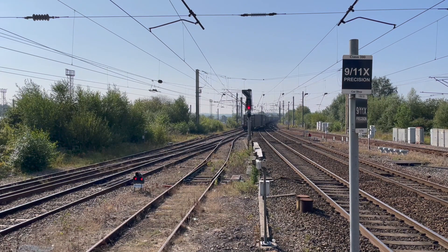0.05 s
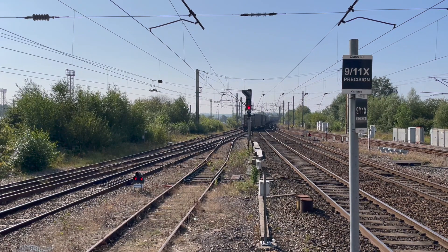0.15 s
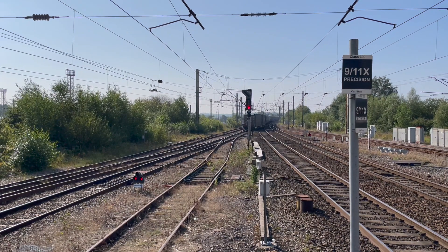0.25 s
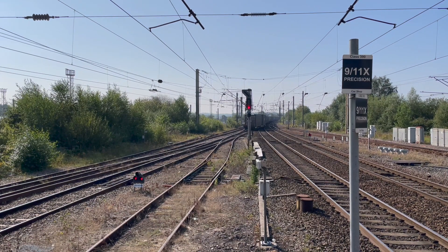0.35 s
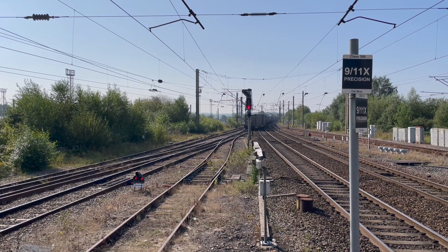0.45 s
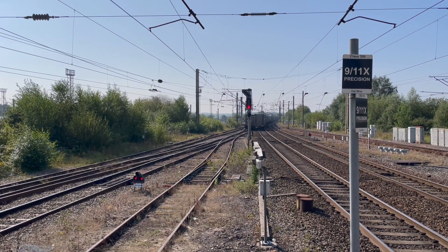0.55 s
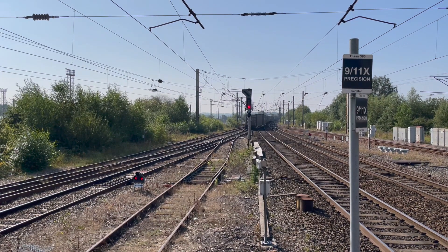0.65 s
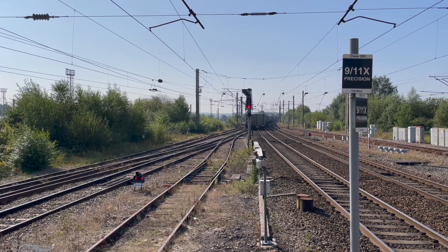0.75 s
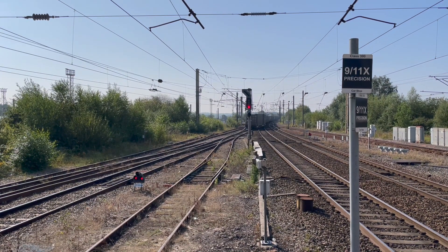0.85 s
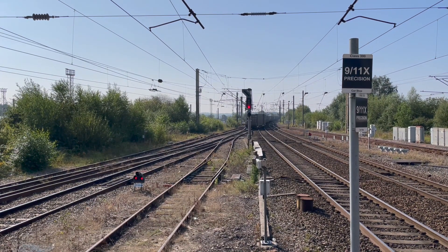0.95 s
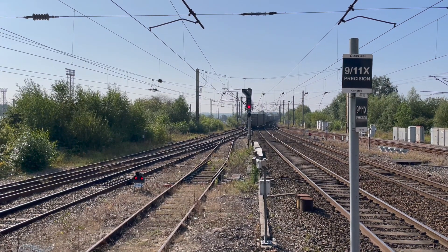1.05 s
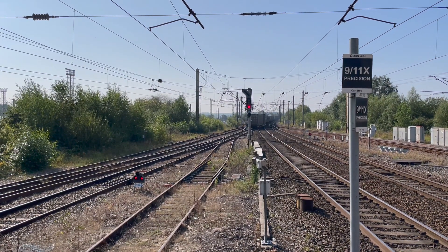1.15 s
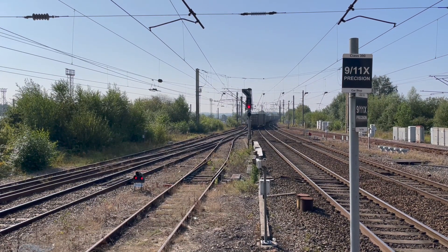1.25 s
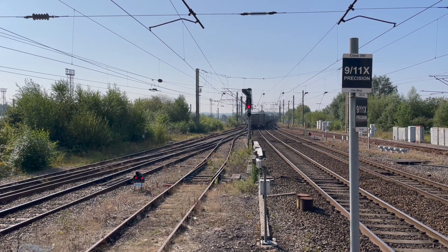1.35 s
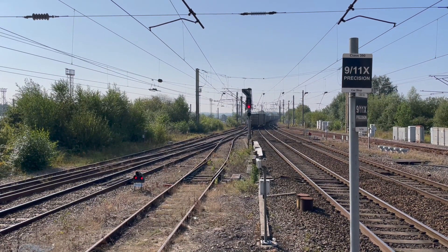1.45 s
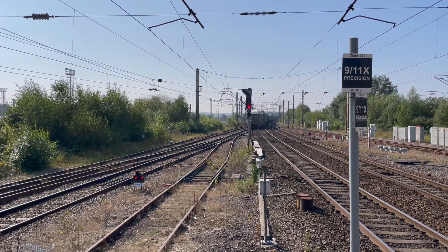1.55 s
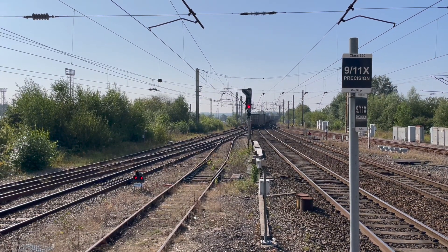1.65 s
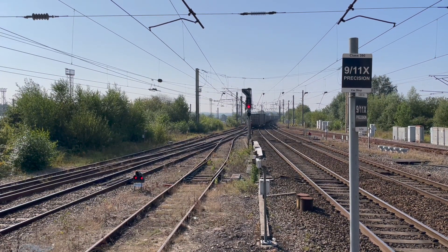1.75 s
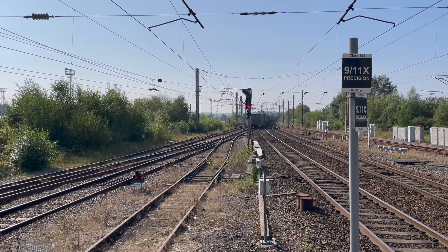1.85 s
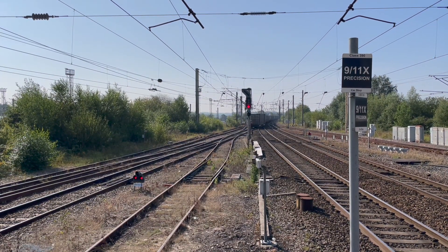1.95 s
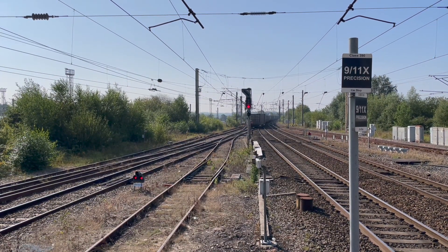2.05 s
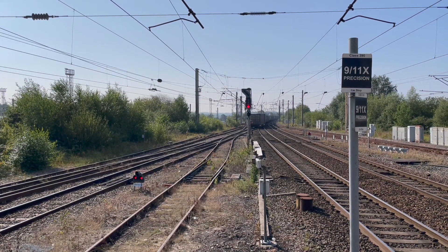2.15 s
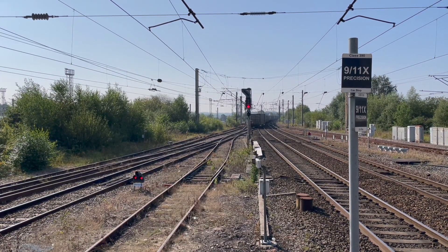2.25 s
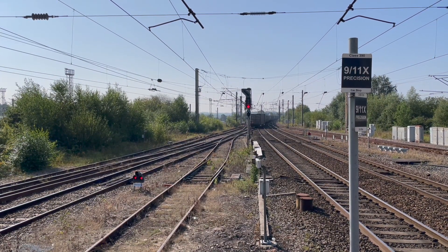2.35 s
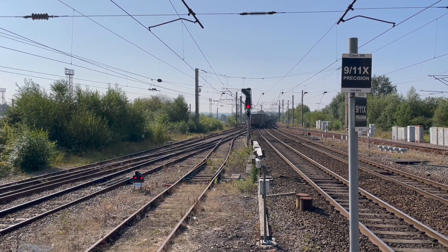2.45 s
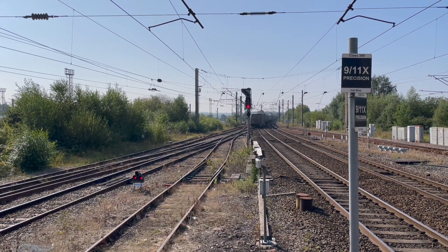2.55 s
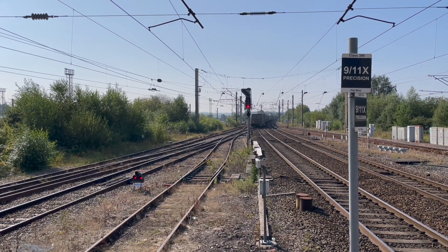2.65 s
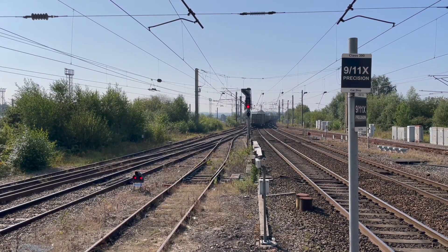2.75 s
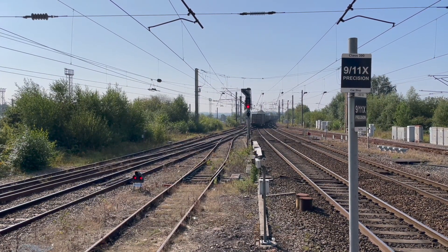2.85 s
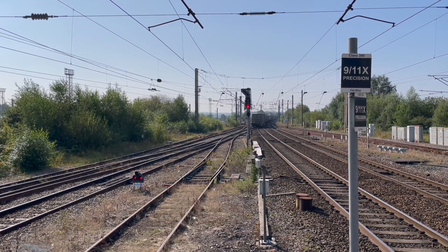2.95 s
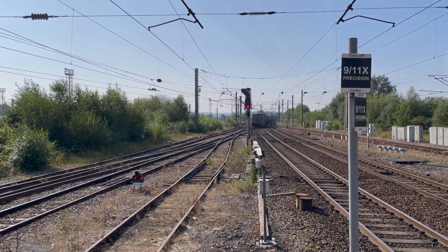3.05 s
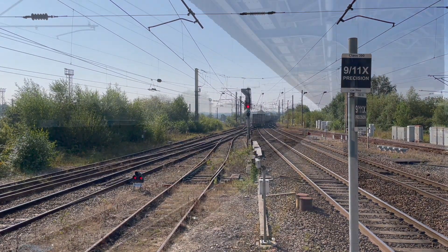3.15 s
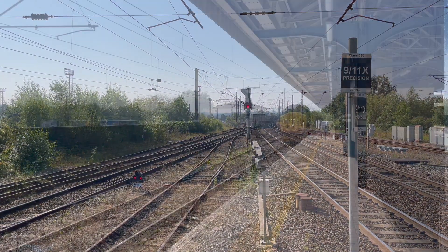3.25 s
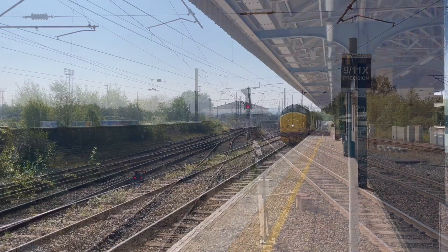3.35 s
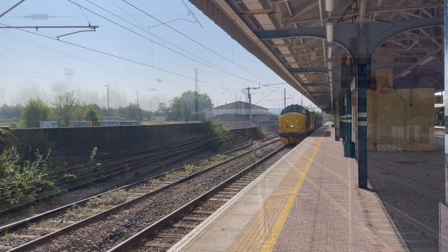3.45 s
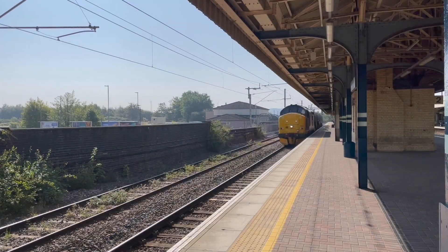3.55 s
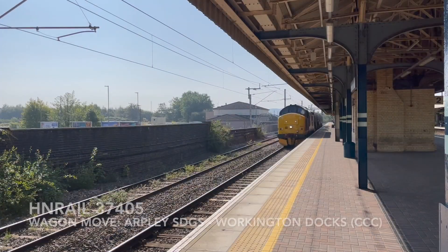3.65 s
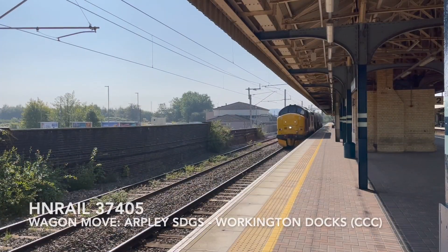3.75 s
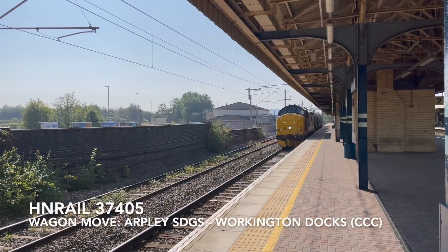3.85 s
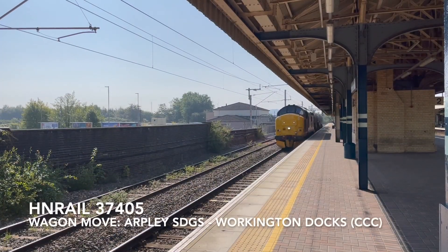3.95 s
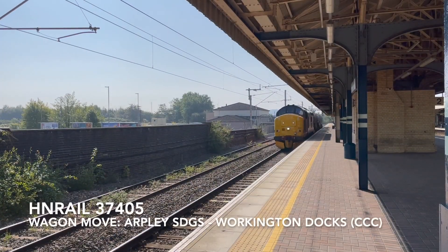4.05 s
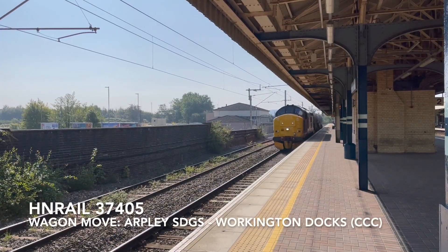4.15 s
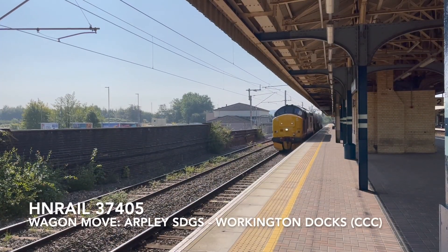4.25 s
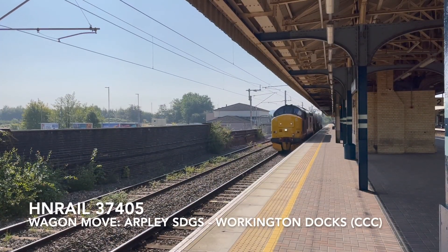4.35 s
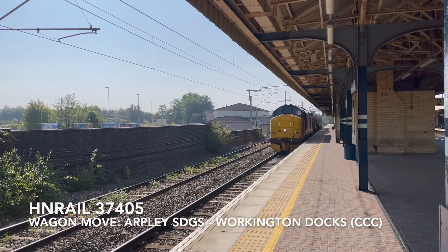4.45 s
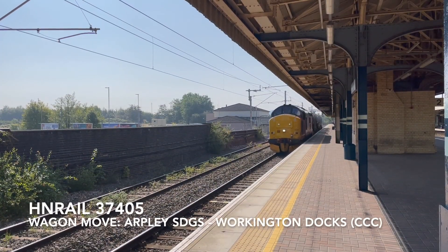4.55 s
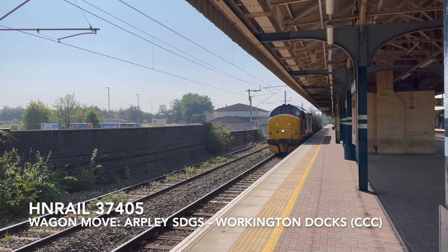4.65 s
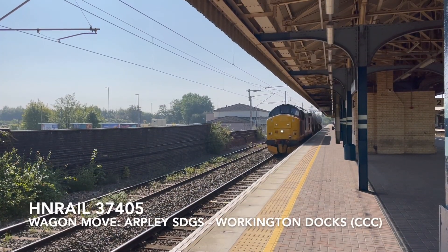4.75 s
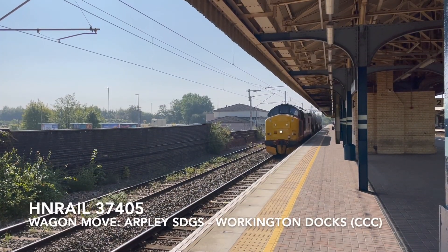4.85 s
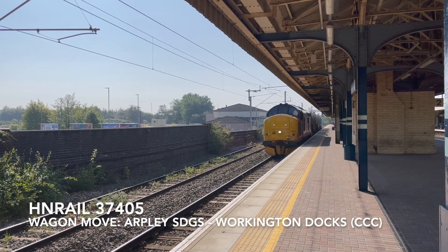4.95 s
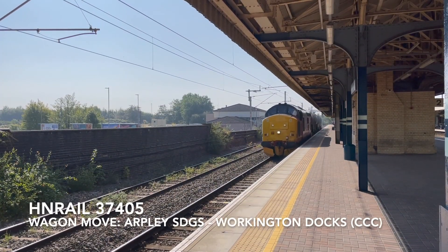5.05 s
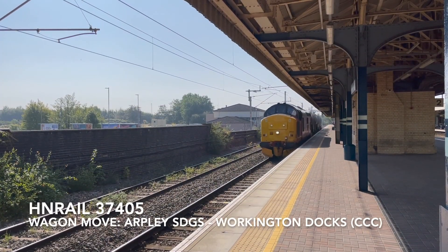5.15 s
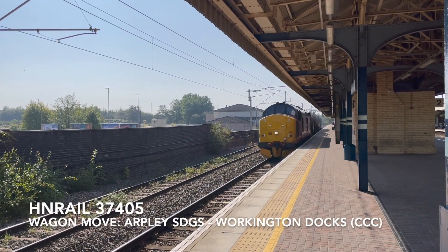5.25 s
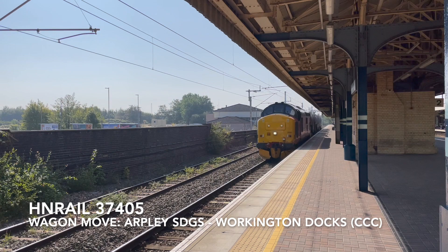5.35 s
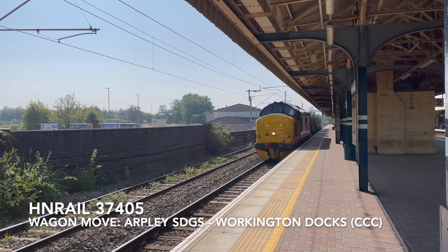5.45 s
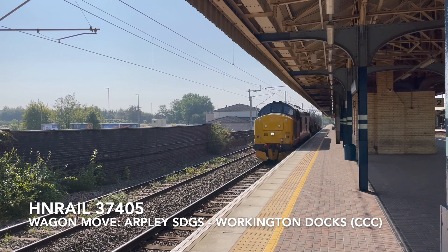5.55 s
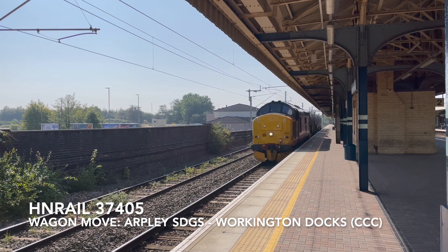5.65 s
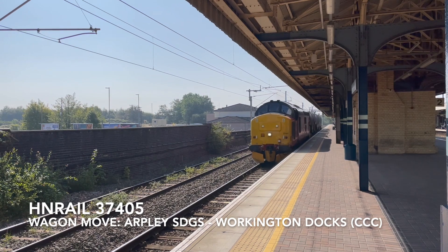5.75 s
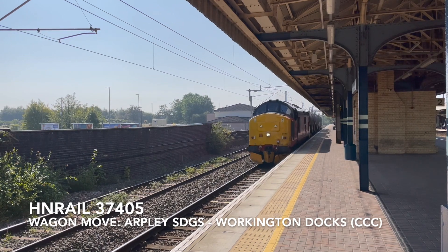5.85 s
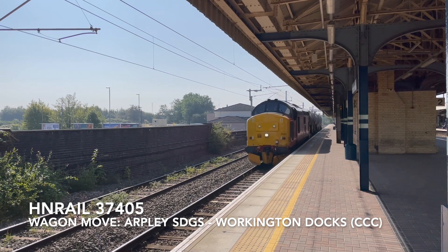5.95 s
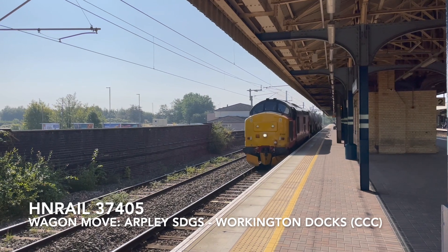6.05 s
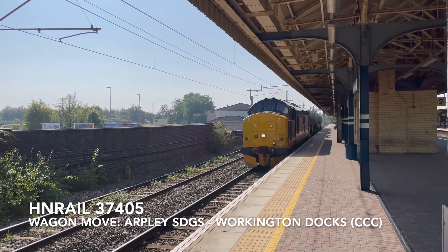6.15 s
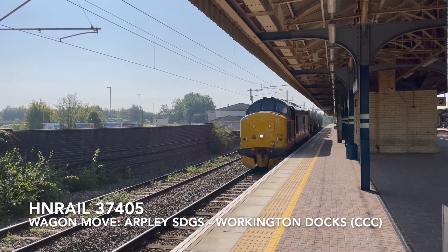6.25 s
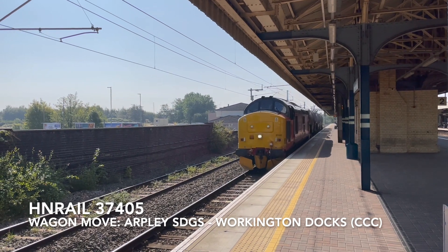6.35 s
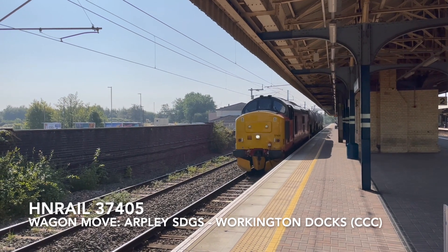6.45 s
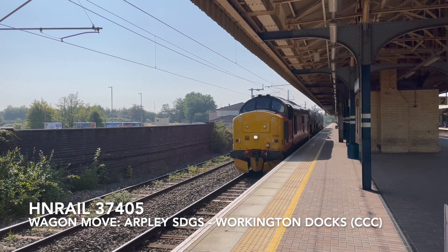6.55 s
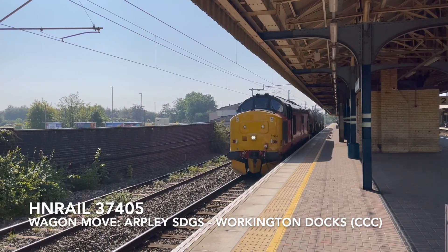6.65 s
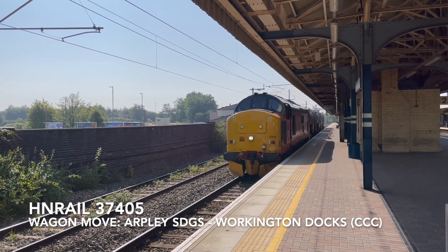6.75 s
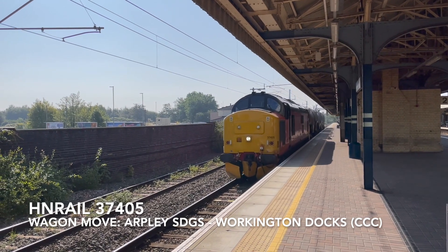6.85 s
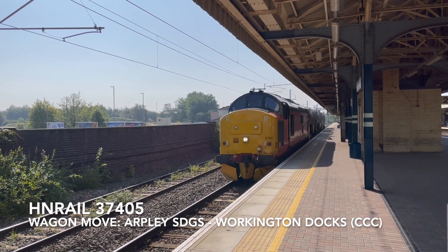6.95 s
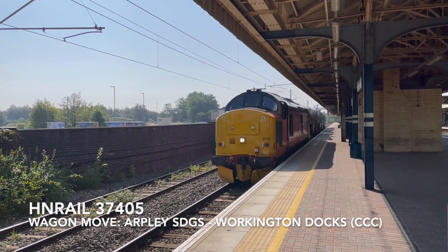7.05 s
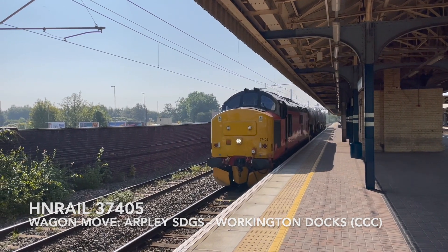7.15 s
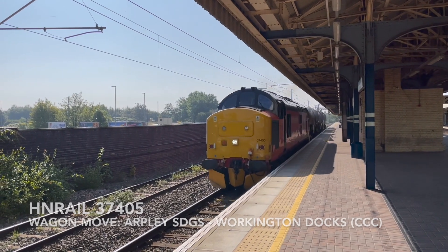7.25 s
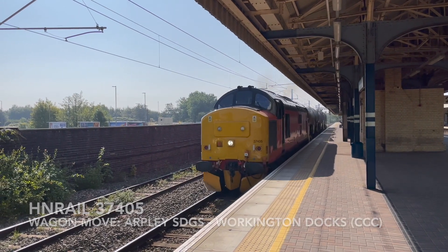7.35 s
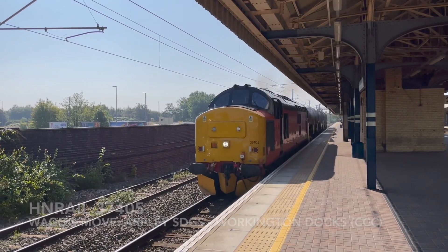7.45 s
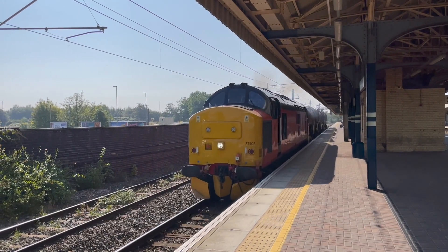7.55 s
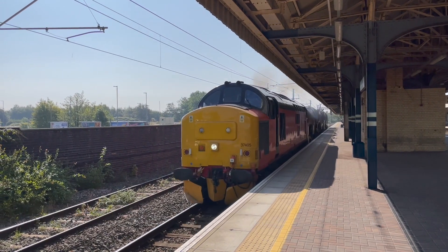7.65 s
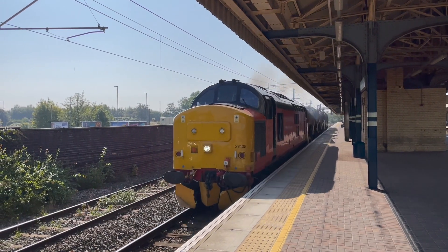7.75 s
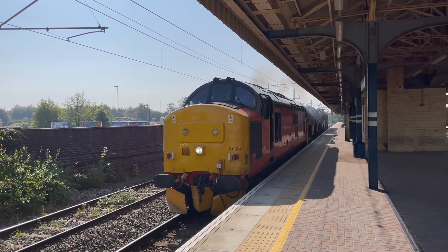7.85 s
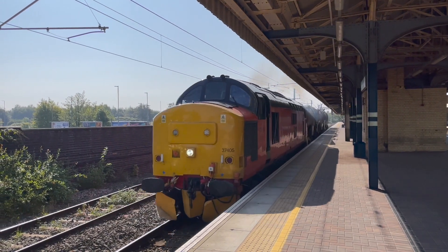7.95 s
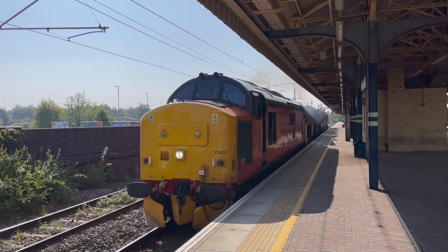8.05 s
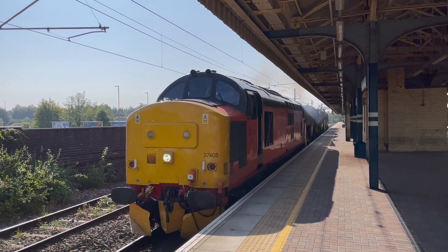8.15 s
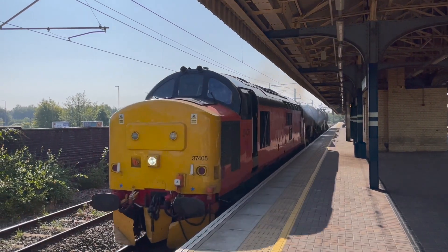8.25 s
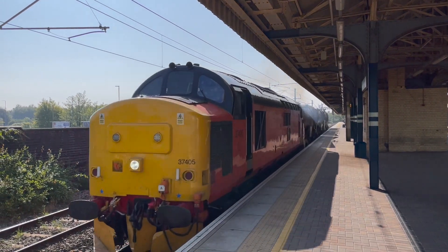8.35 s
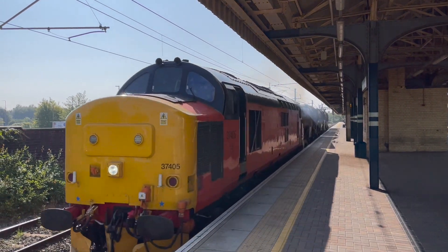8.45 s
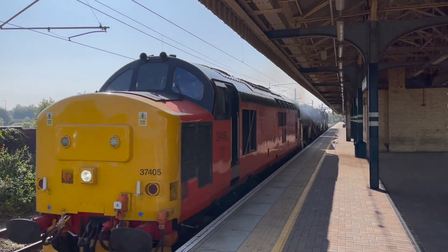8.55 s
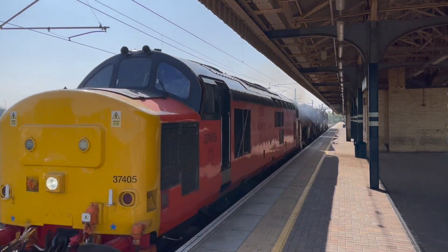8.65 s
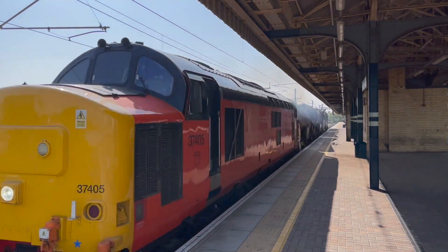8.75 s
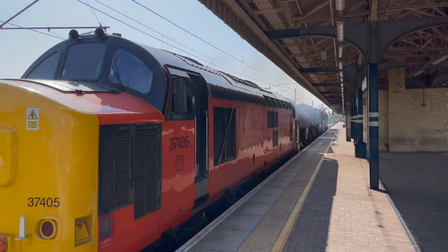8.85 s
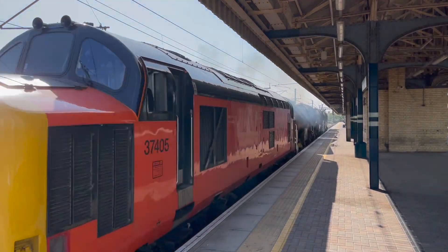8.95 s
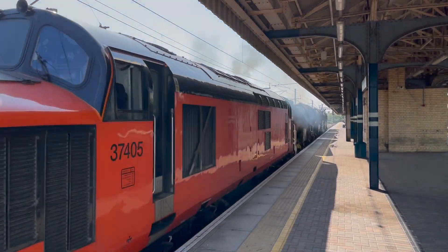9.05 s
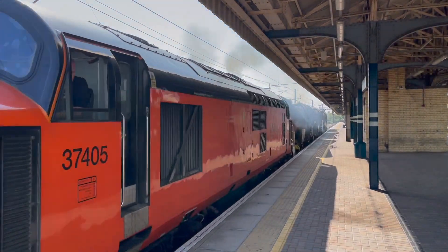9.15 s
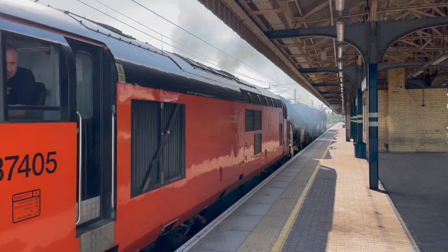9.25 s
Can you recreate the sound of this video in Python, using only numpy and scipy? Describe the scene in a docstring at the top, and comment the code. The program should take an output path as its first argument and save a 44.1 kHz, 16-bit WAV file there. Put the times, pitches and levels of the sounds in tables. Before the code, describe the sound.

A handheld stereo microphone catches soft wind thumps, chirps, a faint whine and washed-out metal clanks across quiet tracks. The scene dissolves to a covered platform where an approaching diesel idles low, then barks and throbs, eases with a brief hum, roars harder with crackling rasp, drops back again, and blasts a third time close by, over pulsing rolling noise, low boom and hiss.

```python
"""A twelve-cylinder diesel locomotive opens up in three surges under a platform roof: tones locked to
the firing rate throb, two stacks puff gated noise in turn, and ringing, knocks and crackles rasp on top.
Rolling noise, rumble and hiss lie under it, shaped by level curves, partly pulsing with the exhaust.
Before it, a quiet rail yard fades out: noise for far rumble and wind, thumps on the microphone,
gliding bird whistles, far clanks of filtered noise and a faint whine."""
import sys
import numpy as np
from scipy import signal
from scipy.fft import rfft, irfft, next_fast_len
from scipy.io import wavfile
from scipy.ndimage import uniform_filter1d

SR = 44100
rng = np.random.default_rng(int(sys.argv[2]) if len(sys.argv) > 2 else 0)


def output_pcm(signal):
    """Save a mono or channel-first signal as 16-bit PCM at the path in sys.argv[1].

    Samples are clipped to [-1, 1] before scaling.
    """
    pcm = np.clip(np.atleast_2d(signal).T, -1, 1) * 32767
    wavfile.write(sys.argv[1], SR, np.round(pcm).astype(np.int16))


N = 410571
SIZE = next_fast_len(N)
HZ = np.maximum(np.arange(SIZE // 2 + 1) * SR / SIZE, 1)
T = np.arange(N) / SR

# Every *_COLOUR is a relative noise spectrum: pitch_hz, level_db (per Hz); noise() evens its loudness.
# Engine speed: time_s, firings_per_s
ENGINE_SPEED = [(5, 45.45), (5.3, 51.16), (5.45, 54.69), (5.6, 55.48), (5.95, 62.32), (6.25, 65.38),
                (6.95, 63.48), (7.55, 71.0), (7.9, 76.0), (8.1, 74.63), (8.45, 70.24), (8.8, 69.17),
                (9.1, 73.77), (9.3, 76.16)]
# Engine load in three surges: time_s, bark_level_db, throb_level_db
ENGINE_LOAD = [(4.95, -43, -41), (5.1, -32, -36), (5.27, -28.5, -40), (5.45, -28, -28), (5.65, -22.5, -17),
               (5.9, -21.5, -17), (6.12, -25, -18.5), (6.27, -29, -20.5), (6.55, -33, -18),
               (6.8, -35.5, -19.5), (6.95, -26, -15), (7.15, -16, -17), (7.5, -14.5, -13.5),
               (7.75, -16, -14), (8.1, -25.5, -16), (8.37, -39.5, -17), (8.62, -26, -16.5),
               (8.7, -22.5, -13.5), (8.79, -17.5, -15), (8.96, -14, -19), (9.31, -18, -21)]
# Side lines of the exhaust: multiple_of_firing_rate, level_db
SIDE_LINES = [(1 / 2, -3), (3 / 4, -5), (5 / 4, -4), (3 / 2, -3), (7 / 4, 3.5), (9 / 4, -8), (5 / 2, -12.5),
              (11 / 4, -16)]
# What pipe and platform roof pass: pitch_hz, level_db
PIPE_RESPONSE = [(20, -23), (35, -14), (55, 2), (68, 10.5), (85, 1.5), (100, -4), (115, 1.5), (135, -1.5),
                 (200, -9)]
# Hum that swells as the engine eases: time_s, pitch_hz, level_db
EASING_HUM = [(6.12, 213, -63), (6.24, 215.3, -30), (6.38, 216.5, -23.5), (6.52, 221.6, -32),
              (6.68, 220, -51)]
# Relative strength of the three puffs a stack gives in an engine cycle: level_db
PUFF_STRENGTHS = [4.5, 4, 4.5]
# Start and end of the two bark crossfades, far to middle and middle to near: time_s
BARK_CROSSFADES = [6.1, 7.0, 8.1, 8.6]
# Bark as the locomotive nears: pitch_hz, level_db (per Hz)
BARK_FAR_COLOUR = [(120, -34), (200, -11.5), (367, 5.5), (420, -8.5), (643, -2.5), (726, -1.5), (911, 1),
                   (998, -7), (1110, 2), (1440, -7.5), (1700, -15.5), (2100, -9.5), (2550, -8.5),
                   (2850, -21.5), (3300, -14.5), (3750, -18), (4200, -13.5), (4700, -20.5), (7500, -25.5),
                   (9750, -73), (16500, -120)]
BARK_MID_COLOUR = [(120, -3.5), (200, 7), (251, -17), (396, 5), (482, -7.5), (596, -1.5), (858, -2.5),
                   (1220, -8.5), (1550, -3), (1800, -17), (2300, -13.5), (2900, -15.5), (3500, -14),
                   (3900, -20), (4830, -19.5), (5620, -25.5), (6440, -23), (7500, -21), (9750, -72),
                   (16500, -120)]
BARK_NEAR_COLOUR = [(120, -44), (200, -17), (306, -12), (440, 1.5), (569, -13), (771, -10), (968, -17),
                    (1460, -10), (1890, -20), (2560, -21.5), (2890, -24.5), (4210, -23.5), (5540, -27.5),
                    (6440, -25), (7500, -26.5), (9750, -58), (16500, -120)]
# How much louder the first stack is than the second, in each surge: pitch_hz, level_db
STACK_LEAN_FAR = [(500, -5.5), (750, 10), (900, -5), (1100, 22), (1400, -7), (2000, 0), (2400, 8),
                  (4000, 3)]
STACK_LEAN_MID = [(500, 4), (700, 0.5), (850, -7), (1100, 14), (1500, 8), (2200, -2), (3000, 7), (5000, 1)]
STACK_LEAN_NEAR = [(500, 5), (750, -3), (950, 10), (1200, 9), (1550, 4), (1850, 3), (3000, -2), (5000, 7.5)]
# Pipe and platform resonances in each surge, one list for each stack: pitch_hz, level_db
STACK_RINGS_FAR = [
    [(1093, -6), (1411, -5), (2250, -21)],
    [(914, -14), (371, -22), (2430, -17)],
]
STACK_RINGS_MID = [
    [(982, -11), (1604, -16), (809, -6.5), (515, -28)],
    [(688, -13), (1550, -9.5), (367.3, -4), (3060, -16.5), (2256, -21), (1055, -14)],
]
STACK_RINGS_NEAR = [
    [(1445, -12), (798, -6.5), (440, -5.5)],
    [(1543, -12), (1210, -10.5), (402, -15), (2610, -15.5)],
]
# Low exhaust boom, before and after the last crossfade: pitch_hz, level_db (per Hz)
BOOM_COLOUR = [(25, -50), (55, -14), (80, -1.5), (97, 2.5), (177, -9), (247, -16.5), (300, -35), (390, -28),
               (660, -120)]
BOOM_NEAR_COLOUR = [(25, -50), (60, -23), (83, -8), (97, -17), (118, 0), (157, 2), (205, -27), (300, -12.5),
                    (390, -46), (660, -120)]
# Hard exhaust knocks, each in one resonance of pipe or platform: start_s, level_db, pitch_hz
EXHAUST_KNOCKS = [(5.089, -18.5, 1053), (5.176, -15, 1050), (5.255, -14, 1030), (5.371, -23, 915),
                  (5.412, -14.5, 1050), (5.553, -12, 1053), (5.628, -10.5, 1115), (5.663, -14, 900),
                  (5.693, -12, 1130), (5.762, -16, 1125), (5.83, -14.5, 1050), (5.895, -27, 1110),
                  (5.961, -14, 1090), (6.024, -23, 895), (6.071, -14, 940), (6.117, -13, 926),
                  (5.2906, -23, 2160), (5.3724, -24, 2250), (5.4498, -15, 2340), (5.5271, -14, 2220),
                  (5.586, -16, 2340), (5.6214, -19, 2350), (5.988, -23, 2430), (6.0564, -26, 2360),
                  (6.1197, -28, 2170), (6.1567, -19, 2350), (7.016, -9, 720), (7.074, -15, 720),
                  (7.144, -6, 1075), (7.198, -11, 835), (7.259, -8.5, 606), (7.438, -10, 1005),
                  (7.468, -10, 710), (7.526, -13.5, 607), (7.58, -14, 1010), (7.635, -6, 830),
                  (7.661, -6.5, 524), (7.692, -9, 580), (7.714, -19, 570), (7.8, -10, 727),
                  (7.4079, -13, 1610), (7.4837, -20, 1560), (7.5246, -7.5, 1570), (7.5475, -21, 1590),
                  (7.5825, -11, 1570), (7.6588, -30, 1410), (7.766, -13.5, 1500), (7.8074, -15, 1430),
                  (7.114, -16, 2900), (7.1723, -11.5, 2800), (7.2945, -12.5, 2330), (7.3514, -20, 2230),
                  (7.4118, -14, 2640), (7.4692, -16, 2610), (7.524, -16, 2570), (7.6906, -22, 2310),
                  (7.7989, -23, 2860), (7.8553, -19, 2830), (8.647, -17, 348), (8.765, -27, 442),
                  (8.85, -17, 433), (8.879, -12, 428), (8.987, -7, 490), (9.042, -4, 457),
                  (9.099, -5.5, 432), (9.151, -8, 428), (9.18, -3, 415), (9.209, -9, 375),
                  (9.229, -8.5, 349), (9.255, -1, 412), (8.762, -8, 767), (8.936, -9, 784),
                  (8.992, -4.5, 807), (9.021, -35, 756), (9.079, -13, 880), (9.151, -9, 670),
                  (9.238, -13, 690), (9.263, -9, 800), (8.6522, -9.5, 1114), (8.6801, -19, 1610),
                  (8.7635, -4.5, 1495), (8.7944, -8, 1730), (8.8188, -4.5, 1490), (8.8503, -13, 1410),
                  (8.9086, -5, 1400), (8.9645, -18, 1380), (8.9884, -8, 1223), (9.0448, -12, 1260),
                  (9.1221, -10, 1130), (9.1531, -8, 1454), (8.6801, -18, 2040), (8.7969, -23, 2210),
                  (8.8228, -16, 2670), (8.8498, -12, 2400), (8.8807, -18, 2380), (8.9066, -17, 2100),
                  (9.0159, -15, 2640), (9.2045, -19, 2270), (9.2873, -23, 2640), (5.447, -28, 4120),
                  (5.5867, -33, 4490), (5.665, -34, 4460), (5.8012, -35, 4300), (5.8321, -28, 4050),
                  (5.8945, -29, 4200), (6.0247, -31, 4200), (6.087, -34, 4290), (7.0824, -21, 4930),
                  (7.1443, -27, 3510), (7.1777, -23, 3460), (7.2356, -18, 4980), (7.2914, -20, 4670),
                  (7.3563, -20, 4840), (7.5239, -25, 3550), (7.5533, -16, 4310), (7.7748, -16, 3700),
                  (8.7975, -20, 4060), (8.8504, -22, 3970), (8.9112, -18, 4230), (8.9636, -24, 4230),
                  (9.018, -22, 3330), (9.0719, -22, 3350), (9.2899, -18, 4990)]
# Echoes off platform, wall and roof: delay_s, level_db
PLATFORM_ECHOES = [(.009, -4.5), (.016, -9), (.023, -10)]
# Crackling rasp of the exhaust gas: time_s, level_db
RASP_LEVEL = [(4.95, -60), (5.2, -45), (5.45, -42), (5.9, -45), (6.2, -41), (6.6, -60), (6.82, -51),
              (6.95, -54), (7.1, -36), (7.5, -33.5), (7.85, -37), (8.1, -50), (8.4, -50), (8.55, -43),
              (8.7, -37), (8.9, -41), (9.31, -34)]
# Rasp spectrum: pitch_hz, level_db (per Hz)
RASP_TONE_COLOUR = [(1200, -40), (1900, -9), (2600, 0), (3400, -1.5), (4400, -0.5), (5600, -14),
                    (7500, -11), (9000, -75)]
# Narrow whistle as the second surge builds: time_s, level_db
WHISTLE_LEVEL = [(6.5, -60), (6.72, -44), (7.0, -44), (7.2, -46), (7.4, -62)]
# Wheels, fans and idling engine: time_s, rolling_level_db, rumble_level_db
TRAIN_LEVELS = [(3.1, -45, -45), (3.3, -40, -43), (3.55, -33.5, -29.5), (4.3, -31.5, -27.5),
                (5.05, -30, -24), (5.45, -23.5, -43), (5.8, -23.5, -27), (6.6, -23.5, -20.5),
                (7.2, -19, -49), (7.85, -19, -35), (8.3, -25, -30), (8.75, -18.5, -35), (9.31, -22.5, -39)]
# Rolling, low rumble and hiss spectra: pitch_hz, level_db (per Hz)
ROLL_COLOUR = [(59, -51), (100, -3), (185, -6.5), (329, -5.5), (577, -14), (679, -13.5), (729, -14),
               (874, -13), (1150, -18.5), (1480, -17), (1800, -22), (2200, -20.5), (3580, -34), (4130, -33),
               (7500, -45), (9750, -85), (16500, -120)]
RUMBLE_COLOUR = [(12, -43), (20, -13), (40, -8), (59, 1), (105, -5.5), (130, -12), (200, -17), (260, -14.5),
                 (440, -120)]
HISS_COLOUR = [(3500, -56), (5000, -46), (6500, 10), (8000, -59), (10000, 11.5), (12500, 4.5), (14500, 0),
               (16000, -2.5)]
# Spits of an air valve: start_s, level_db
AIR_SPITS = [(3.683, -57), (3.846, -55), (4.13, -60), (4.384, -52), (4.711, -53), (5.046, -52)]
# Far wagon couplings: start_s, level_db, t60_s, tilt_db_per_octave
COUPLING_CLANKS = [(1.4755, -51, 0.77, -4), (1.54, -56, 0.54, -6), (1.824, -47.5, 0.98, -3),
                   (2.01, -56, 0.35, -7), (2.5894, -50, 0.56, -2.5)]
# Steel resonances of the couplings: pitch_hz, width_hz, level_db
COUPLING_MODES = [(1500, 370, -3.5), (2170, 540, -1), (2630, 140, -15), (3720, 650, -6.5), (4900, 200, -15),
                  (6000, 2300, -11)]
# Bird notes: start_s, length_s, from_hz, to_hz, level_db
BIRD_NOTES = [(.0, .045, 3620, 3540, -60), (.43, .03, 4300, 4380, -66), (1.065, .022, 4500, 4900, -69),
              (.0, 0.24, 3920, 3990, -71), (.43, .16, 8850, 8550, -78.5), (0.547, 0.19, 8100, 7840, -75),
              (.63, .12, 7350, 7150, -72), (0.832, .02, 4350, 3700, -58), (0.914, 0.06, 3710, 3900, -58),
              (.94, .03, 3850, 4200, -57), (0.955, 0.025, 4270, 3700, -53), (0.974, .07, 4200, 4000, -63),
              (1.08, 0.049, 3820, 3430, -50), (1.12, .04, 3350, 3150, -58), (1.156, 0.04, 3500, 3340, -58),
              (1.199, 0.066, 3160, 2880, -55), (1.314, 0.045, 3890, 3630, -49.5),
              (1.313, 0.055, 4800, 4660, -65.5), (1.51, 0.11, 4850, 4750, -63),
              (2.584, 0.21, 5070, 4950, -63), (2.6, .3, 5180, 5100, -74), (2.76, 0.38, 4970, 5040, -69),
              (3.105, .055, 3800, 3700, -65)]
# Faint far whine, swelling at the clanks: time_s, level_db
WHINE_LEVEL = [(0, -73), (1.42, -86), (1.49, -59), (1.78, -69), (1.84, -60), (2.2, -70), (2.7, -66),
               (2.85, -76), (3.3, -80), (3.4, -120)]
# Wind on the ports: time_s, level_db
WIND_LEVEL = [(0, -31.5), (.6, -31.5), (.8, -36.5), (1.1, -29), (1.3, -34.5), (1.4, -33.5), (2.0, -27),
              (2.66, -29.5), (2.76, -43.5), (3.3, -39), (3.5, -21.5)]
# Wind spectrum: pitch_hz, level_db (per Hz)
WIND_TONE_COLOUR = [(12, -48), (20, -40), (39, 5), (64, 6.5), (125, -3), (285, -25.5), (331, -19),
                    (400, -40), (520, -53), (880, -120)]
# Gust knocks on the microphone: start_s, level_db, pitch_hz
GUST_THUMPS = [(0.152, -23.5, 70), (0.549, -33, 75.5), (1.362, -21, 84), (1.481, -18.5, 103),
               (1.615, -21, 63), (1.817, -9.5, 123.5), (1.901, -24, 54.6), (2.024, -16, 107),
               (2.196, -20, 61.6), (2.515, -10, 75), (2.601, -22.5, 139), (2.649, -20.5, 129),
               (2.7, -34, 160)]
# Far traffic rumble: time_s, level_db
YARD_LEVEL = [(0, -41), (.7, -43), (1.4, -41.5), (2.1, -40), (2.8, -43), (3.2, -43.5), (3.5, -36)]
# Far rumble spectrum: pitch_hz, level_db (per Hz)
YARD_TONE_COLOUR = [(40, -77), (90, -11.5), (150, -5), (255, -12.5), (400, -15), (730, -23), (950, -23),
                    (1150, -30.5), (1500, -26.5), (1800, -37), (2200, -28), (2650, -38), (3100, -41),
                    (4000, -40.5), (4800, -46), (7300, -58.5), (8000, -69), (16000, -110)]
# Share of sound power that reaches both ports alike: pitch_hz, share_0_to_1
SHARED_YARD = [(60, 0.79), (290, 0.92), (640, 0.5), (1400, 0.2), (3100, 1), (7000, 0.2), (12000, 0.9)]
SHARED_TRAIN = [(60, 0.97), (290, 0.96), (640, 0.68), (1400, 0.51), (2300, 0.89), (3300, 0.58),
                (5000, 0.22), (7500, 0.8), (12000, 1)]
# Stereo balance of the whole scene: time_s, left_over_right_db
BALANCE = [(0, -1.9), (2.9, -2.1), (3.3, 0), (9.31, 0)]
# Balance of the two ports: pitch_hz, left_over_right_db
PORT_BALANCE = [(60, 2.5), (110, 2.5), (200, 3.5), (380, 1), (700, 5), (1290, 5), (2380, 2.5), (4400, 0),
                (8120, 2), (15000, -3)]

LOUD_DB = -23                                # bark level about which boom and hiss swing
PUFF_DEPTH, DEEPEST = 0.84, 0.9              # base pulsing share; its limit leaves some steady flow
DEPTH_PER_RISE, DEPTH_NEARS_PER_S = 0.013, 0.04  # share per dB/s of bark swell; share per s about 7 s
PUFF_LEAD = 0.47                             # firings by which the puffs lead the throb's upswing
RINGS_DB, RINGS_DB_PER_DEPTH = 0, 10.5       # ringing over the bark; extra with deeper puffs
RING_SPREAD_DB, RING_ROUGH = 2.5, 0.65       # puff-to-puff spread; turbulent phase, radians at 1 kHz
BOOM_DB, BOOM_FOLLOWS, LINES_DB = -24, 0.66, -0.5  # boom, its share of bark swing, lines over boom
LINES_SINK_DB_PER_S = 3                      # upper side lines sink as the locomotive nears, about 6 s
KNOCK_RISE_S, KNOCK_T60_S = 0.00079, 0.038   # at 1 kHz; lower knocks are slower
CRACKLES_PER_S, CRACKLES_BUNCH = 2200, 2.5   # rate where puff is 1; bunching in the puffs (power)
WHISTLE_HZ, WHISTLE_WIDTH_HZ = 2670, 72
HISS_PULSES, ROLL_PULSES = 1.2, 0.5          # how strongly they follow the puffs (power)
HISS_DB, HISS_FOLLOWS, HISS_NEARS_DB_PER_S = -39, 1.1, 1   # hiss under load, at 8.5 s
IDLE_HISS_DB, IDLE_NEARS_DB_PER_S, SPIT_T60_S = -63.5, 3.5, 0.23   # idle hiss at 4 s; spit decay
SLAP_DB, THUMP_TOP_HZ = -5.5, 330            # noisy slap with each gust knock; low-pass over both
LEFT_LEAD_S = 5.7e-5                         # shared sound reaches the left port first
WIDTH_ENDS_HZ, CUTOFF_HZ = 10800, 15850


def exhaust():
    """Sum throb, hum, bark and boom of the gas pulses; return sound and puff envelope."""
    firing_hz, = in_time(ENGINE_SPEED)
    bark_db, throb_db = in_time(ENGINE_LOAD)
    boom_db = BOOM_DB + BOOM_FOLLOWS * (bark_db - LOUD_DB)
    firings = np.cumsum(firing_hz * (T >= ENGINE_SPEED[0][0])) / SR
    swell_db_per_s = uniform_filter1d(np.gradient(bark_db) * SR, size=SR // 5)
    depth = PUFF_DEPTH + DEPTH_NEARS_PER_S * (T - 7) + DEPTH_PER_RISE * swell_db_per_s
    first, second = two_stacks(firings, depth)
    puff = np.hypot(first, second)
    to_mid, to_near = [fade(a, b - a) for a, b in np.reshape(BARK_CROSSFADES, (2, 2))]

    tones = firing_tones(firings, firing_hz, throb_db, boom_db) + easing_hum()
    bark = amp(bark_db) * stack_bark(firings, depth, first, second, to_mid, to_near)
    boom = amp(boom_db) * exhaust_boom(puff, to_near)
    opened = fade(5.04, 0.26)
    return opened * (tones + bark + boom), 1 + opened * (puff - 1)


def firing_tones(firings, firing_hz, throb_db, boom_db):
    """Repeating combustion gives a throb at the firing rate and side lines shaped by the pipe."""
    tones = np.sqrt(2) * amp(throb_db + 1.9 * drift(27.0)) * np.sin(2 * np.pi * firings)
    for multiple, db in SIDE_LINES:
        phase = 2 * np.pi * rng.random() + 0.28 * drift(2.2)
        pipe_db = np.interp(multiple * firing_hz, *np.transpose(PIPE_RESPONSE))
        sink_db = LINES_SINK_DB_PER_S * (T - 6) * (multiple > 1)
        line_db = boom_db + LINES_DB - sink_db + db + pipe_db + 2.0 * drift(3.0)
        tones += amp(line_db) * np.sin(2 * np.pi * multiple * firings + phase)
    return tones


def easing_hum():
    """A gliding sine hums as the engine eases."""
    hum_hz, hum_db = in_time(EASING_HUM)
    return np.sqrt(2) * amp(hum_db) * np.sin(2 * np.pi * np.cumsum(hum_hz) / SR)


def two_stacks(firings, depth):
    """Two stacks blow down in turn, two firings apart, with their slow loudness evened out."""
    depth = np.clip(depth, 0, DEEPEST)
    first, second = [puffing(firings + PUFF_LEAD + later, depth) for later in (0, 2)]
    even = np.sqrt(uniform_filter1d(first ** 2 + second ** 2, size=SR // 3))
    return first / even, second / even


def puffing(firings, depth):
    """One uneven blow-down of gas every fourth firing, over a steady share of flow."""
    which, through = (firings // 4).astype(int), firings / 4 % 1
    chance_db = 1.3 * rng.standard_normal(200)
    strength = amp(np.array(PUFF_STRENGTHS)[which % 3] + chance_db[which])
    shape = strength * through / 0.22 * np.exp(1 - through / 0.21)
    return 1 - depth + depth * shape * 0.62


def stack_bark(firings, depth, first, second, to_mid, to_near):
    """Turbulent gas barks from both stacks and excites resonances, crossfading through three colours."""
    weights = (1 - to_mid, to_mid - to_near, to_near)
    colours = (BARK_FAR_COLOUR, BARK_MID_COLOUR, BARK_NEAR_COLOUR)
    leans = (STACK_LEAN_FAR, STACK_LEAN_MID, STACK_LEAN_NEAR)
    ring_sets = (STACK_RINGS_FAR, STACK_RINGS_MID, STACK_RINGS_NEAR)
    ring_gain = amp(RINGS_DB + RINGS_DB_PER_DEPTH * (depth - PUFF_DEPTH))
    bark = 0
    for weight, colour, lean, modes in zip(weights, colours, leans, ring_sets):
        share = 1 / (1 + amp(-2 * at_hz(lean)))       # power share of the first stack
        gas = noise(colour, SHARED_TRAIN, first, 10 * np.log10(share))
        gas += noise(colour, SHARED_TRAIN, second, 10 * np.log10(1 - share))
        bark = bark + np.sqrt(weight) * (gas + ring_gain * rings(firings, modes))
    return bark


def rings(firings, modes):
    """Each puff rings every resonance of its stack with chance strength, pitch and start."""
    out, at_ports = 0, T - LEFT_LEAD_S * np.array([[0], [1]])
    for stack, own in enumerate(modes):
        cycles = (firings + PUFF_LEAD + 2 * stack) / 4
        for hz, db in own:
            level, detune, start, slip = rng.standard_normal((200, 4))[cycles.astype(int)].T
            through = np.maximum(cycles % 1 - 0.036 * np.abs(slip), 0) / 0.11
            shape = through * np.exp(1 - through) * amp(db + RING_SPREAD_DB * level)
            rough = RING_ROUGH * np.sqrt(hz / 1000) * drift(70)
            turn = 2 * np.pi * hz * (1 + .045 * detune) * at_ports
            out = out + shape * np.sin(turn + 10 * start + rough)
    return out


def exhaust_boom(puff, to_near):
    """Low gas noise pulses softly with the puffs and changes colour as the locomotive nears."""
    far = noise(BOOM_COLOUR, SHARED_TRAIN, puff ** 0.18)
    near = noise(BOOM_NEAR_COLOUR, SHARED_TRAIN, puff ** 0.33)
    return np.sqrt(1 - to_near) * far + np.sqrt(to_near) * near


def knocks():
    """Sharp decaying sines ring pipe or platform, with uneven echoes that differ at the two ports."""
    out, t = np.zeros((2, N + SR)), np.arange(SR // 12) / SR
    arrivals = [(0.0001, 0)] + PLATFORM_ECHOES
    chances = rng.standard_normal((len(EXHAUST_KNOCKS), len(arrivals), 4))
    port_t = LEFT_LEAD_S * np.array([[0], [1]])
    for (s, db, hz), chance in zip(EXHAUST_KNOCKS, chances):
        slow = np.sqrt(1000 / hz)
        rise_s = KNOCK_RISE_S * slow
        shape = (1 - np.exp(-t / rise_s)) * amp(-60 * t / (KNOCK_T60_S * slow))
        for (delay_s, echo_db), (slip, detune, start, apart) in zip(arrivals, chance):
            at = round((s - rise_s + delay_s * (1 + 0.1555 * slip)) * SR)
            turn = 2 * np.pi * hz * ((1 + 0.012 * detune) * t - port_t) + 10 * start
            port_turn = (delay_s > 0) * 0.16 / slow * apart * np.array([[1], [-1]])
            out[:, at:at + len(t)] += amp(db + echo_db) * shape * np.sin(turn + port_turn)
    return out[:, :N]


def rasp(puff):
    """Exhaust gas crackles: random grains of uneven strength, denser in the puffs, gate bright noise."""
    struck = rng.random(N) < CRACKLES_PER_S * puff ** CRACKLES_BUNCH / SR
    grains = struck * amp(3.5 * np.minimum(rng.exponential(1, N), 5))
    gate = uniform_filter1d(grains, size=40) + 1e-3
    return fade(4.95, .1) * amp(in_time(RASP_LEVEL)[0]) * noise(RASP_TONE_COLOUR, SHARED_TRAIN, gate=gate)


def engine_whistle():
    """A narrow resonance turns noise into a breathy whistle as the second surge builds."""
    whistle = narrow_band(rng.standard_normal((2, N)), WHISTLE_HZ, WHISTLE_WIDTH_HZ)
    return fade(6.4, .1) * amp(in_time(WHISTLE_LEVEL)[0]) * whistle


def train(puff):
    """Wheels, fans and idling engine: pulsed rolling noise, lumpy rumble and hiss."""
    roll_db, rumble_db = in_time(TRAIN_LEVELS)
    roll = amp(roll_db) * noise(ROLL_COLOUR, SHARED_TRAIN, gate=puff ** ROLL_PULSES)
    rumble = amp(rumble_db) * noise(RUMBLE_COLOUR, SHARED_TRAIN, gate=amp(2.05 * drift(8.5)))
    return fade(3.07, 0.32) * (roll + rumble + air_hiss(puff))


def air_hiss(puff):
    """Escaping air spits at idle, then its noise follows the load and pulses with the exhaust."""
    load_swing_db = HISS_FOLLOWS * (in_time(ENGINE_LOAD)[0] - LOUD_DB)
    loaded = fade(4.6, 0.14) * amp(HISS_DB + load_swing_db + HISS_NEARS_DB_PER_S * (T - 8.5))
    idle = amp(IDLE_HISS_DB + IDLE_NEARS_DB_PER_S * (T - 4.0))
    spits = sum(amp(db) * burst(s, .008, SPIT_T60_S) for s, db in AIR_SPITS)
    gate = puff ** HISS_PULSES * amp(0.5 * drift(8.2))
    return np.hypot(idle + spits, loaded) * noise(HISS_COLOUR, SHARED_TRAIN, gate=gate)


def clanks():
    """Far wagons buffer up: washed-out, uneven noise bursts in a few steel resonances."""
    out, white = 0, rng.standard_normal((2, N)) * amp(1.8 * drift(25))
    for hz, width_hz, db in COUPLING_MODES:
        octaves = np.log2(hz / 2500)
        blows = sum(amp(peak_db + tilt_db * octaves) * burst(s, 0.003, t60)
                    for s, peak_db, t60, tilt_db in COUPLING_CLANKS)
        out = out + amp(db) * blows * narrow_band(white, hz, width_hz)
    return signal.sosfilt(signal.butter(6, 7200, fs=SR, output="sos"), out)      # air takes the top


def birds():
    """Short gliding, fluttering sine whistles with a smear of echoes."""
    out, flutter = np.zeros(N), 1 + .009 * drift(90)
    broken = amp(3.5 * drift(60))
    for s, length_s, from_hz, to_hz, db in BIRD_NOTES:
        at, n = round(s * SR), round(length_s * SR)
        hz = np.linspace(from_hz, to_hz, n) * flutter[at:at + n]
        from_edge = np.minimum(np.arange(n), np.arange(n)[::-1])
        shape = np.minimum(from_edge / (0.0072 * SR), 1) * np.geomspace(1, .25, n) * broken[at:at + n]
        out[at:at + n] += amp(db) * shape * np.sin(2 * np.pi * np.cumsum(hz) / SR)
    echo_s = np.arange(SR // 3) / SR
    echoes = rng.standard_normal((2, SR // 3)) * amp(-27.0 - 60 * echo_s / 0.32)
    return out + signal.fftconvolve(out[None], echoes, axes=1)[:, :N]


def far_whine():
    """A far wavering tone sits in a narrow band of noise."""
    tone = np.sin(2 * np.pi * 2790 * T + 2.5 * drift(15)) * amp(3.0 * drift(12))
    breath = narrow_band(rng.standard_normal((2, N)), 2790, 130)
    return amp(in_time(WHINE_LEVEL)[0]) * (tone + 0.67 * breath)


def yard():
    """Wind, gust knocks and far rumble fade out as the platform takes over."""
    return (wind() + gust_knocks() + far_rumble()) * (1 - fade(3.19, 0.4))


def wind():
    """Turbulent air on the ports: low noise with quick and slow lumps."""
    gate = amp(0.76 * drift(34) + 3.1 * drift(5.9))
    return amp(in_time(WIND_LEVEL)[0]) * noise(WIND_TONE_COLOUR, SHARED_YARD, gate=gate)


def gust_knocks():
    """Gusts thump the microphone: dull decaying sines, each with a noisy slap."""
    thumps = sum(amp(db) * burst(s, 0.0027, 0.089) * np.sin(2 * np.pi * hz * (T - s))
                 for s, db, hz in GUST_THUMPS)
    slap_shape = sum(amp(db + SLAP_DB) * burst(s, 0.0057, 0.11) for s, db, hz in GUST_THUMPS)
    slaps = slap_shape * narrow_band(rng.standard_normal(N), 182, 140)
    dull = signal.butter(4, THUMP_TOP_HZ, fs=SR, output="sos")
    return signal.sosfilt(dull, thumps + slaps)


def far_rumble():
    """Far traffic blurs into gently wavering noise."""
    gate = amp(0.59 * drift(9.8))
    return amp(in_time(YARD_LEVEL)[0]) * noise(YARD_TONE_COLOUR, SHARED_YARD, gate=gate)


def amp(db):
    """Turn decibels into an amplitude factor."""
    return 10 ** (np.asarray(db) / 20)


def rms_one(x):
    """Scale to rms 1."""
    return x / np.sqrt(np.mean(x ** 2) + 1e-20)


def in_time(rows):
    """Draw each column as a line over time."""
    s, *columns = np.transpose(rows)
    return [np.interp(T, s, c) for c in columns]


def at_hz(points):
    """Draw a curve over log frequency."""
    hz, values = np.array(points).T
    return np.interp(np.log(HZ), np.log(hz), values)


def fade(start_s, length_s):
    """Rise from 0 to 1."""
    return np.clip((T - start_s) / length_s, 0, 1)


def drift(rate):
    """Slow random wander of rms 1: white noise through two equal poles, one step in 40 samples."""
    r = np.exp(-80 * np.pi * rate / SR)
    white = rng.standard_normal(N // 40 + 2002)
    slow = signal.lfilter([1], [1, -2 * r, r * r], white)[2000:]
    return np.interp(np.arange(N) / 40, np.arange(len(slow)), rms_one(slow))


def noise(colour, direct, gate=1, lean_db=0):
    """Gated noise at two ports: a shared wave, late at the right, plus scatter; rms 1 without lean."""
    shared, left, right = rfft(gate * rng.standard_normal((3, N)), SIZE)
    share = np.clip(at_hz(direct), 0, 1)
    late = shared * np.exp(-2j * np.pi * HZ * LEFT_LEAD_S)
    pair = np.sqrt(share) * np.array([shared, late]) + np.sqrt(1 - share) * np.array([left, right])
    gain = amp(at_hz(colour))
    loudness = np.sqrt(np.mean(gain ** 2) * np.mean(np.square(gate)))
    return irfft(pair * gain * amp(lean_db), SIZE)[:, :N] / loudness


def resonance(x, hz, width_hz):
    """A damped resonance: one pole pair with zeros at both ends of the spectrum."""
    r = np.exp(-np.pi * width_hz / SR)
    zeros = [(1 - r * r) / 2, 0, (r * r - 1) / 2]
    return signal.lfilter(zeros, [1, -2 * r * np.cos(2 * np.pi * hz / SR), r * r], x)


def narrow_band(x, hz, width_hz):
    """Two equal resonances in a row, scaled to rms 1."""
    return rms_one(resonance(resonance(x, hz, width_hz), hz, width_hz))


def burst(s, rise_s, t60):
    """Quick rise, exponential fall."""
    t = np.maximum(T - s, 0)
    return (1 - np.exp(-t / rise_s)) * amp(-60 * t / t60)


def scene():
    """Mix locomotive and yard, then set the stereo balance."""
    engine, puff = exhaust()
    locomotive = engine + knocks() + rasp(puff) + engine_whistle() + train(puff)
    background = clanks() + birds() + far_whine() + yard()
    balance_db, = in_time(BALANCE)
    return (locomotive + background) * amp(balance_db * [[.5], [-.5]])


def record(dry):
    """Colour the ports apart, round the peaks, narrow the highest treble to mono and cut the top."""
    port_gain = amp(at_hz(PORT_BALANCE) * [[.5], [-.5]])
    ports = irfft(rfft(dry, SIZE) * port_gain, SIZE)[:, :N]
    left, right = 1.05 * np.tanh(ports / 1.05)
    narrowing = signal.butter(3, WIDTH_ENDS_HZ, fs=SR, output="sos")
    side = signal.sosfiltfilt(narrowing, (left - right) / 2)
    both = (left + right) / 2 + side * [[1], [-1]]
    return signal.sosfilt(signal.cheby2(16, 70, CUTOFF_HZ, fs=SR, output="sos"), both)


dry = scene()
out = record(dry)
output_pcm(out)
```